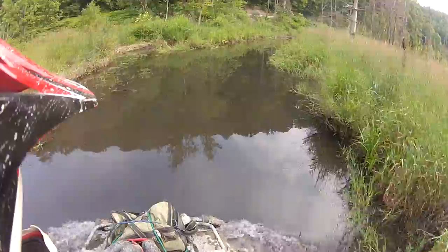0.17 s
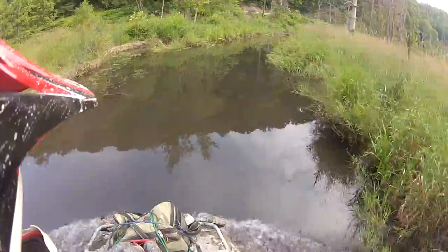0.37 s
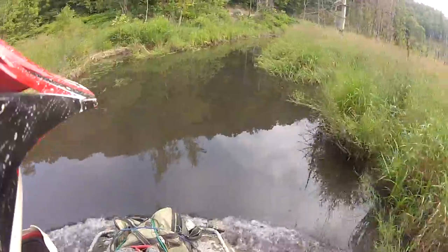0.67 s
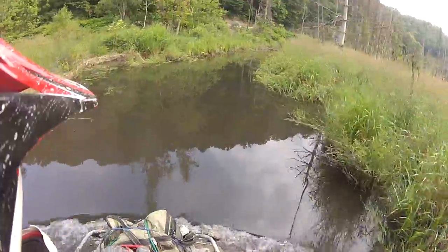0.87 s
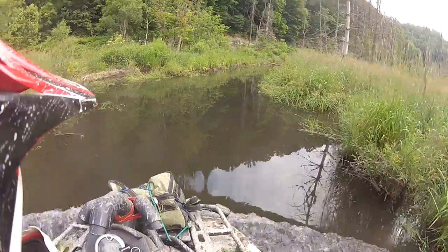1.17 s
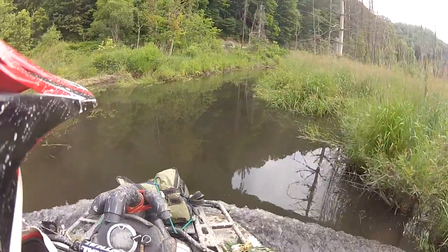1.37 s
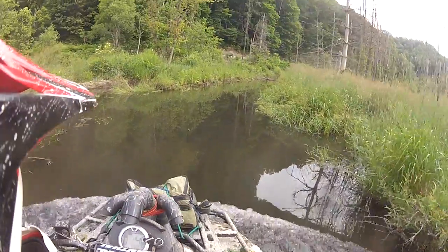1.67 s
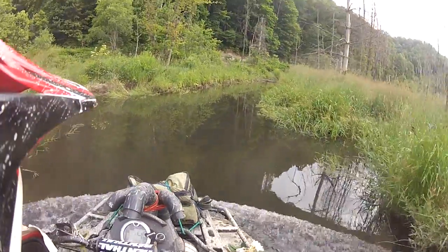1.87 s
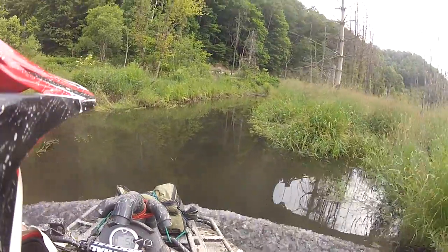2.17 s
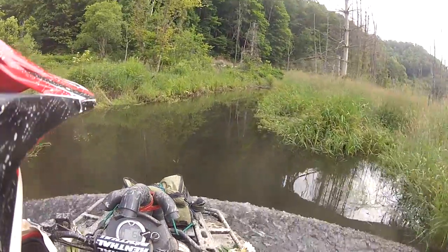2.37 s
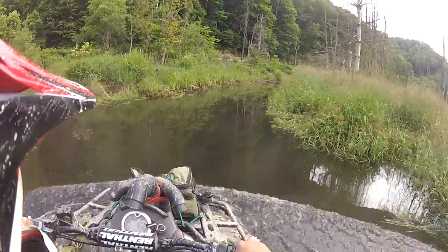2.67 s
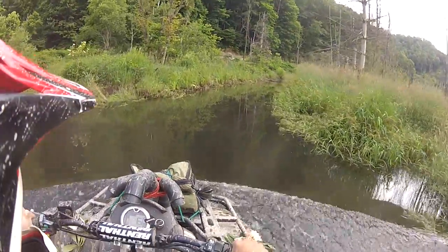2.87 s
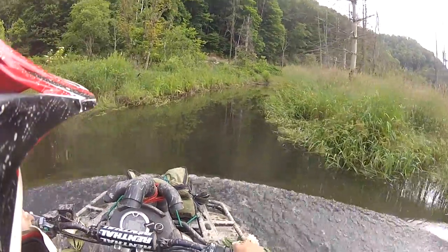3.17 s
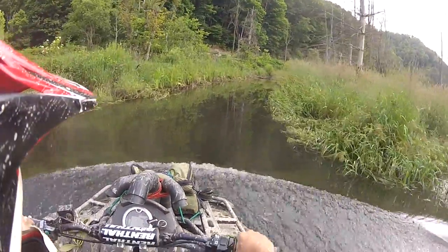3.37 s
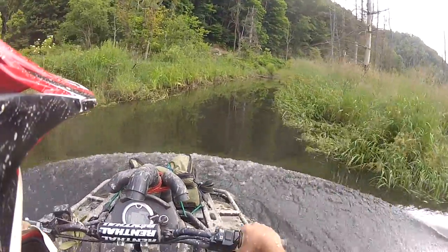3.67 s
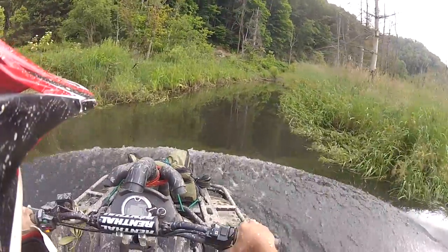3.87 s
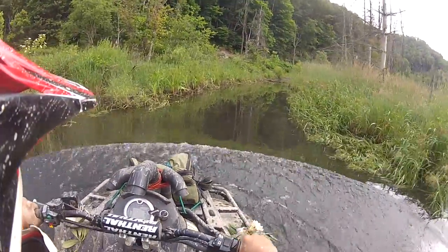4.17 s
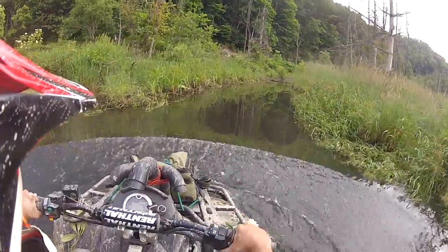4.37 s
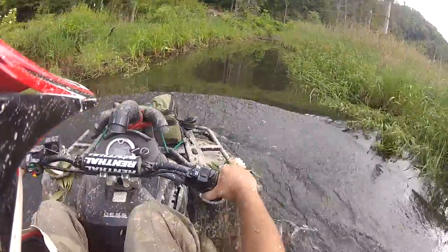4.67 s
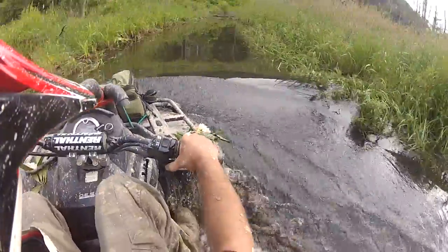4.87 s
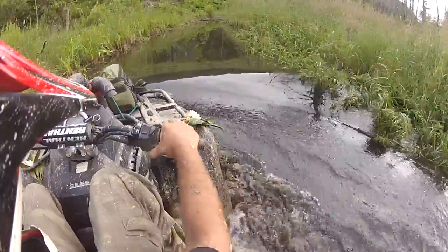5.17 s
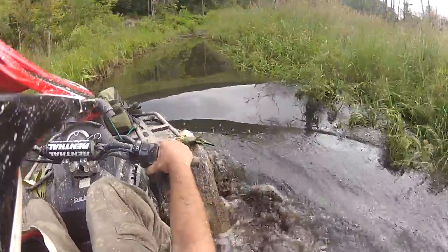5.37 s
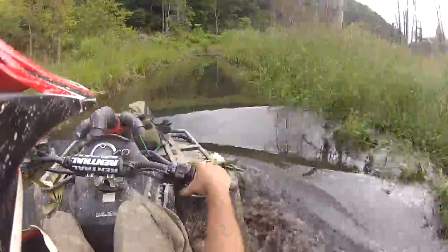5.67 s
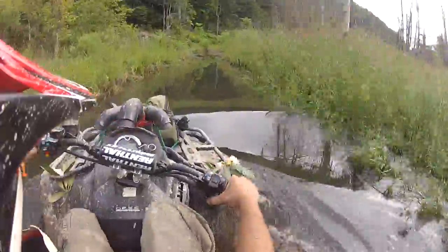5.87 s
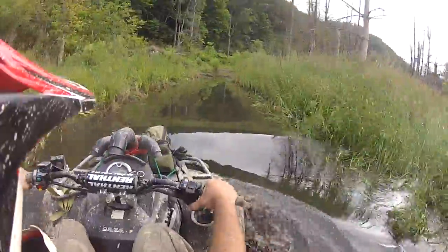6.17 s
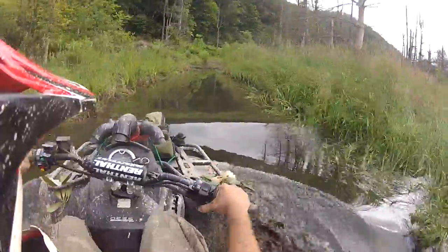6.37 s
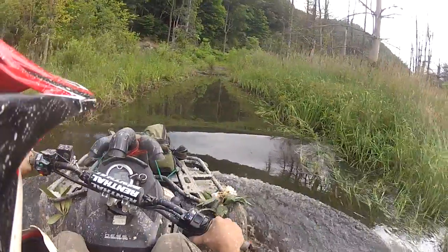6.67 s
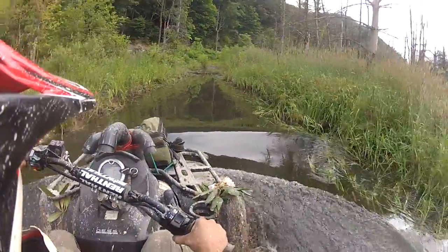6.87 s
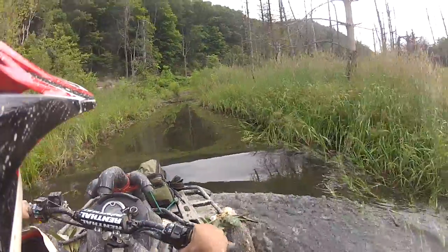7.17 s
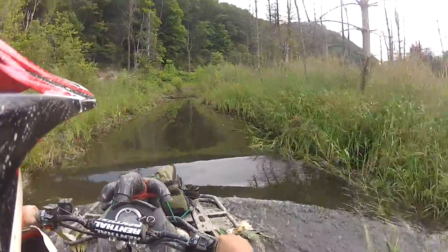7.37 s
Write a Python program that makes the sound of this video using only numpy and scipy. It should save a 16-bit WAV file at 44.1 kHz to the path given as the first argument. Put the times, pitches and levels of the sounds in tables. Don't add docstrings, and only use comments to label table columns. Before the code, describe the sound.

A quad bike idles in shallow water, then revs up and throbs loudly under load, its bow wave hissing and fizzing around rattling covers.

```python
import sys
import numpy as np
from scipy import signal
from scipy.fft import rfft, irfft, next_fast_len
from scipy.io import wavfile
from scipy.ndimage import uniform_filter1d, map_coordinates

SR = 44100
rng = np.random.default_rng(int(sys.argv[2]) if len(sys.argv) > 2 else 0)


def convert_level_to_amplitude(level_db):
    exponent = np.asarray(level_db, float) / 20
    return 10 ** exponent


def output_pcm(signal):
    pcm = np.clip(np.atleast_2d(signal).T, -1, 1) * 32767
    wavfile.write(sys.argv[1], SR, np.round(pcm).astype(np.int16))


N = 331632


def unit(x):
    return x / np.sqrt(np.mean(x ** 2) + 1e-20)


def curves(rows):
    s, *cols = np.transpose(rows)
    return [np.interp(np.arange(N) / SR, s, c) for c in cols]


def wobble(rate):
    knots = rng.standard_normal(int(N * rate / SR) + 4)
    return map_coordinates(knots, [np.arange(N) * rate / SR])


def filtered(x, response):
    m = next_fast_len(N + 8192)
    return irfft(rfft(x, m) * response(np.fft.rfftfreq(m, 1 / SR)), m)[..., :N]


def coloured(x, spectrum):
    f, db = np.transpose(spectrum)
    return unit(filtered(x, lambda hz: convert_level_to_amplitude(np.interp(np.log(hz + 1), np.log(f), db, -120, -120))))


def patchy(patchy_db):
    z = signal.stft(rng.standard_normal(N + 2048), nperseg=2048)[2]
    field = uniform_filter1d(rng.standard_normal(z.shape), size=3, axis=0)
    field = uniform_filter1d(field, size=6, axis=1)
    return signal.istft(z * convert_level_to_amplitude(patchy_db * unit(field)), nperseg=2048)[1][:N]


def bursts(count, spread_db):
    at, chance = rng.random((count, 2)).T
    size_db = np.minimum(-spread_db * np.log(1 - chance), 3 * spread_db)
    clicks = convert_level_to_amplitude(size_db) * rng.choice([-1, 1], count)
    return unit(np.bincount((at * N).astype(int), clicks, N))


def wet(shallow_db, rush_share, covered_db):
    # (time [s], rush of water [dB], how far the water covers the engine [0-1])
    wading = [(0, 0, 0), (.6, 0.3, 0.05), (1.5, 0.9, 0), (2.1, 3.5, .05), (2.7, 6.5, 0.2), (3.2, 5.6, 0.3),
              (4.3, 5, 0.64), (5.2, 6.5, 1), (6, 5.5, 0.95), (6.35, 5.5, 1), (6.6, 4.5, .9),
              (6.9, 5.5, 0.85), (7.52, 5, 0.8)]
    rush_db, covered = curves(wading)
    return shallow_db + rush_share * rush_db + covered_db * covered


def order_levels(rate):
    # (time [s], effort [dB], uneven firing of the two cylinders [0-1])
    throttle = [(0.0, -6.5, 0.96), (1.4, -5, 1.02), (1.65, -1.5, 1.07), (1.9, 1, 0.78), (2.2, -2.5, 0.58),
                (2.45, -5.5, 0.42), (2.7, -4, 0.05), (3.1, -1.1, 0.16), (4.0, 3.5, 0.38), (4.6, 6.5, 0.64),
                (5.1, 6.5, 0.57), (5.45, 5, 0.77), (5.8, 3, 0.52), (6.2, 0.6, 0.25), (6.45, 3.5, 0.73),
                (6.8, -3.5, 0.07), (7.1, -1.5, 0.36), (7.52, -1.95, 0.55)]
    # (order, level at even firing [dB], share of effort, gain at uneven firing [dB])
    strong = [(2, -36, 0.27, 2), (3, -35.5, 0.71, -8), (4, -34, 0.79, -7.5), (5, -53.5, 0.66, 14.5),
              (6, -34, 1.22, -11), (7, -59.5, 0.38, 8), (8, -99, 0.046, 49), (9, -67.5, 0.28, 8),
              (10, -53, 1.1, -21.5), (11, -48, 0.13, -10), (12, -51.5, 0.68, -11), (13, -50.5, 2.08, 0.5)]
    # (order, idling level [dB], pulling level [dB], share of effort)
    weak = [(1, -102, -54.5, .4), (14, -64.5, -63.5, -0.53), (15.01, -61, -72.5, -.1),
            (16.03, -70, -77, 0.052), (29, -70, -90, .1)]
    # (frequency [Hz], gain [dB])
    pipe = [(50.1, -18.5), (141.6, 7), (187.6, 0.7), (200.1, 9.5), (245.4, -0.64), (285.3, 6), (323.2, 17),
            (459.2, -21.5)]
    effort_db, uneven = curves(throttle)
    pipe_hz, pipe_db = np.transpose(pipe)
    pulling = np.clip((rate - 30) / 3, 0, 1)
    levels = {}
    for k, idle_db, pull_db, share in weak:
        driven_db = idle_db + pulling * (pull_db - idle_db + share * effort_db)
        levels[round(k)] = driven_db + 2 * wobble(3.31)
    for k, even_db, share, uneven_db in strong:
        resonance_db = np.interp(np.log(round(k) * rate), np.log(pipe_hz), pipe_db)
        levels[round(k)] = even_db + share * effort_db + uneven_db * uneven + resonance_db
    return levels


def exhaust(rate, turn):
    # (speed [firing cycles/s], lead of all orders, order 2, order 7, order 8 [rad])
    pulse_lead = [(27.2, 3.2, 1.1, 3, 0), (30, 0, 3.1, .1, -2.4), (33, -1.3, 4.1, -2.4, -2.4),
                  (38.7, -3.8, 5.9, -3.6, -2.2)]
    # (time [s], level [dB])
    tailpipe = [(0, 0.5), (1.3, 2), (1.6, 3), (2, 1.5), (2.4, 0), (3, -1), (4.7, -1.5), (5.15, 3.5),
                (5.6, 4), (6, 1), (6.6, -0.5), (6.95, 4.5), (7.2, 0), (7.52, -15)]
    load = np.clip((rate - 28) / 8, 0, 1)
    outlet_db = curves(tailpipe)[0]
    speeds, *leads = np.transpose(pulse_lead)
    common, *own = [np.interp(rate, speeds, lead) for lead in leads]
    own = dict(zip((2, 7, 8), own))
    out = np.zeros(N)
    for k, db in order_levels(rate).items():
        late = (k > 8) * (2 * np.pi * k * rate * .0065 - np.pi)
        flip = (k == 5) * load * 2.75 / (1 + np.exp((182 - k * rate) / 5))
        swing = (k == 6) * (1 - load) * 1.4 - (k == 3) * (1 - load) * 1.2 + (k == 9) * load * 1.4
        unsteady = .4 + 1.3 * load * (k > 6)
        level_db = db + (k > 8) * outlet_db + unsteady * wobble(20)
        lead = flip + swing + own.get(k, 0) + common - late + .22 * unsteady * wobble(20)
        out += np.sqrt(2) * convert_level_to_amplitude(level_db) * np.cos(k * turn + lead)
    return out


def gas_rush(turn):
    # (frequency [Hz], level [dB])
    gas = [(35, -12), (60, -6.5), (150, 2), (260, -1), (400, -4.5), (500, -10), (640, -8.5), (800, -10),
           (900, -36)]
    gate = 1 + 0.25 * np.cos(2 * turn)
    return convert_level_to_amplitude(wet(-50.5, 0.96, .2)) * coloured(gate * patchy(patchy_db=0.0), gas)


def tappets(turn):
    # (frequency [Hz], level [dB])
    heads = [(700, -2), (775, -7), (820, -17), (900, 4.5), (1100, 0), (1190, -12), (1280, 5), (1400, -6),
             (1580, -14), (1760, -19), (2400, 3.5), (2850, -24), (3700, -16), (5500, -16)]
    quarter = turn / np.pi * 2 + .3 * np.sin(turn)
    at = np.flatnonzero(np.diff(np.floor(quarter)) > 0)
    ticks = np.bincount(at, convert_level_to_amplitude(3.4 * rng.standard_normal(len(at))), N)
    return convert_level_to_amplitude(wet(-55.5, 0.86, -8)) * coloured(ticks, heads)


def gearbox(rate):
    # (time [s], tooth frequency at cruising engine speed [Hz], level [dB])
    gear = [(1.85, 570, -72), (2.08, 574, -61), (2.2, 563, -54), (2.35, 537, -49), (2.55, 511, -52),
            (2.9, 527, -65), (3.15, 524, -56), (3.65, 531, -57), (4.15, 568, -57), (4.45, 563, -60),
            (5, 571, -54), (5.4, 586, -61), (5.6, 578, -55), (5.86, 585, -63), (6.3, 572, -58),
            (6.9, 572, -57), (7.1, 566, -63), (7.52, 576, -54)]
    cruise_per_s, tooth_hz_per_cycle = 36, 28
    hz, db = curves(gear)
    hz = hz + tooth_hz_per_cycle * (rate - cruise_per_s)
    phase = 2 * np.pi * np.cumsum(hz + 4 * wobble(25)) / SR
    return np.sqrt(2) * convert_level_to_amplitude(db + 2 + 2.3 * wobble(10)) * np.sin(phase)


def intake_whistle():
    # (start [s], length [s], level [dB])
    whistles = [
        (1.65, .75, -70),
        (2.498, .65, -56),
        (6.3, 1.3, -70),
    ]
    floor_db, edge_s = -69.5, 0.042
    t = np.arange(N) / SR
    tone = np.sin(2 * np.pi * np.cumsum(2905 + 14 * wobble(60)) / SR)
    strength = convert_level_to_amplitude(floor_db)
    for s, length, db in whistles:
        strength = strength + convert_level_to_amplitude(db) * np.clip(np.minimum(t - s, s + length - t) / edge_s, 0, 1)
    return np.sqrt(2) * strength * convert_level_to_amplitude(1.3 * wobble(22)) * tone


def bodywork(turn):
    # (frequency [Hz], level [dB])
    covers = [(760, -63), (820, -12.5), (930, -8.5), (985, -2), (1045, -7.5), (1095, 1), (1140, -6),
              (1185, -14.5), (1230, -36)]
    # (frequency [Hz], level [dB])
    churn = [(1150, -26), (1210, -13.5), (1290, -1), (1380, -9.5), (1530, 1.5), (1620, 1), (1700, -2),
             (1760, -23), (1820, -16)]
    # (time [s], gain [dB])
    sloshes = [
        (3, 2),
        (4.62, 2.5),
        (5.75, 2.5),
        (6.3, 4),
        (7.4, 1.5),
    ]
    slosh_s = 0.15
    t = np.arange(N) / SR
    slosh_db = sum(db * np.exp(-((t - s) / slosh_s) ** 2) for s, db in sloshes)

    def firing(lag):
        return 1 + .22 * np.cos(turn - lag) + .12 * np.cos(2 * turn) + .15 * np.cos(3 * turn)

    clatter = coloured(firing(lag=0) * patchy(patchy_db=1.2), covers)
    churning = coloured(firing(lag=2.7) * patchy(patchy_db=1.0), churn)
    return convert_level_to_amplitude(wet(-54, 0.74, 1.7)) * clatter + convert_level_to_amplitude(wet(-57.5, 1.41, 0.63) + slosh_db) * churning


def bow_wave(turn):
    # (frequency [Hz], level [dB])
    hiss_colour = [(1700, -20), (1810, -1), (1950, -2), (2070, -0.5), (2180, -1.5), (2340, 1.5), (2395, 1),
                   (2445, 3), (2570, -3.5), (2680, -0.5), (2800, -6), (3000, -10), (3150, -9)]
    # (frequency [Hz], level [dB])
    fizz_colour = [(1760, -45), (3000, -5), (3080, -6.5), (3310, 0), (3490, -2), (3760, -1), (4140, -10.5),
                   (4600, -7), (5130, -3), (5430, -7), (5950, -17.5), (7740, -44), (13100, -120)]
    shake = convert_level_to_amplitude(0.36 * wobble(12) + 0.29 * wobble(40)) * (1 + 0.053 * np.cos(2 * turn))
    hiss = shake * patchy(patchy_db=1.44) + 0.2 * bursts(count=9000, spread_db=0.5)
    fizz = shake * patchy(patchy_db=2.3) + 0.66 * bursts(count=14000, spread_db=2.5)
    hiss = convert_level_to_amplitude(wet(-50.5, 1.11, -2.34)) * coloured(hiss, hiss_colour)
    return hiss + convert_level_to_amplitude(wet(-55.5, 0.98, .3)) * coloured(fizz, fizz_colour)


def case_knock():
    # (time [s], peak level [dB])
    knocks = [
        (.9508, -41),
        (.9530, -39),
        (.9590, -42),
    ]
    crack_db, crack_s, ring_s = 9, .008, .03
    t = np.arange(SR // 40) / SR
    ring = sum(np.sin(2 * np.pi * hz * t) for hz in (470, 640, 800, 1010, 1290, 1600))
    ring = ring * (1 - np.exp(-t / .0003))
    crack = convert_level_to_amplitude(crack_db - 60 * t / crack_s) * uniform_filter1d(rng.standard_normal(len(t)), size=7)
    out = np.zeros(N)
    for s, db in knocks:
        out[round(s * SR):][:len(t)] += convert_level_to_amplitude(db - 60 * t / ring_s) * (ring + crack)
    return out


def wind_gusts():
    # (time [s], peak level [dB])
    gusts = [(.08, -48), (.4, -41), (.63, -49), (.8, -54.5), (1.02, -49), (1.29, -36), (1.63, -50),
             (1.8, -42), (1.97, -48), (2.29, -51), (2.47, -54), (2.88, -44), (3.03, -44), (3.27, -47),
             (3.64, -51), (3.87, -51), (4.05, -49), (4.19, -47), (4.42, -51), (4.62, -42), (4.98, -48),
             (5.3, -55), (5.67, -51), (5.86, -43), (6.25, -53), (6.5, -49), (6.8, -50), (7.06, -41),
             (7.44, -50)]
    rise_db_per_s, fall_db_per_s, calm_db = 121, 99, -80
    t = np.arange(N) / SR
    push = convert_level_to_amplitude(calm_db)
    for s, db in gusts:
        push = push + convert_level_to_amplitude(db - np.maximum(rise_db_per_s * (s - t), fall_db_per_s * (t - s)))
    return np.sqrt(2) * push * np.sin(2 * np.pi * np.cumsum(21 + 2 * wobble(4)) / SR)


def scene():
    # (time [s], speed [firing cycles/s])
    speed = [(0.0, 26.75), (1.55, 26.85), (1.71, 29.25), (2.16, 32.82), (2.49, 37.77), (2.59, 38.72),
             (2.74, 38.61), (2.86, 38.4), (4.02, 39.27), (4.44, 38.19), (4.98, 39.57), (5.52, 38.12),
             (5.79, 34.99), (6.22, 36.93), (6.45, 33.72), (6.67, 36.8), (7.23, 34.81), (7.52, 33.95)]
    # (time [s], speed change [firing cycles/s])
    ruts = [
        (3.16, .64),
        (3.64, .59),
        (6.89, -1.1),
    ]
    rut_s, start_turn = .09, -2.3
    t = np.arange(N) / SR
    rate = curves(speed)[0] + sum(step * np.exp(-((t - s) / rut_s) ** 2) for s, step in ruts)
    turn = start_turn + 2 * np.pi * np.cumsum(rate) / SR
    engine = exhaust(rate, turn) + gas_rush(turn) + tappets(turn)
    machine = gearbox(rate) + intake_whistle() + bodywork(turn)
    return (engine + machine + bow_wave(turn) + case_knock() + wind_gusts())[None]


def sample_and_hold(x):
    clock_hz, repeats = 12000, 4
    band = filtered(x, lambda hz: hz < clock_hz / 2)
    sampled = band * (1 + 2 * np.cos(2 * np.pi * clock_hz * np.arange(N) / SR))
    return filtered(sampled, lambda hz: np.sinc(hz / clock_hz) / np.sinc(hz / clock_hz / repeats))


def band_limit(x):
    return signal.sosfilt(signal.butter(12, 15210, fs=SR, output="sos"), x)


def record(dry):
    held = sample_and_hold(dry)
    return band_limit(held)


dry = scene()
out = record(dry)
output_pcm(out)
```